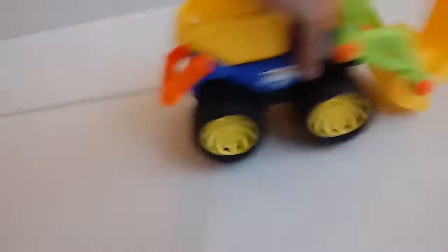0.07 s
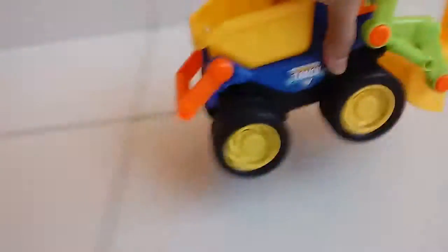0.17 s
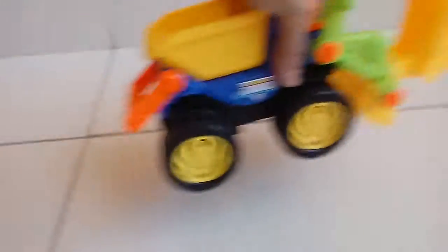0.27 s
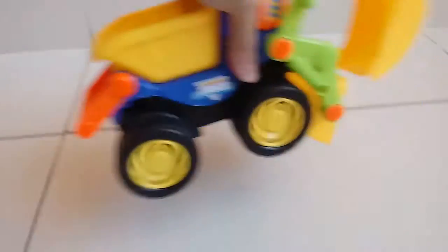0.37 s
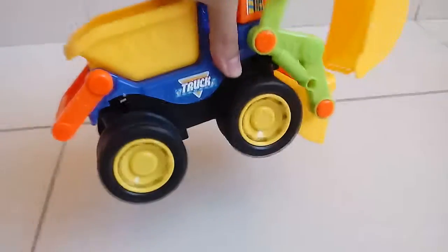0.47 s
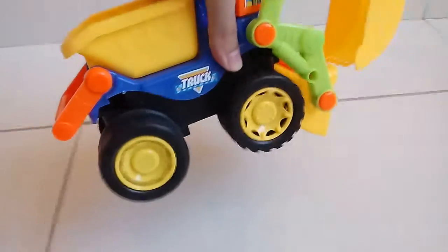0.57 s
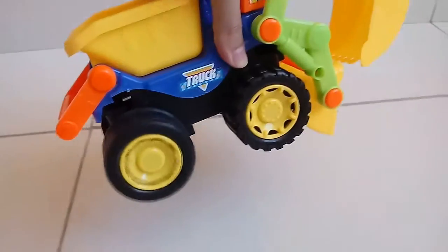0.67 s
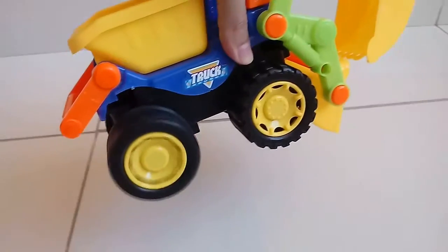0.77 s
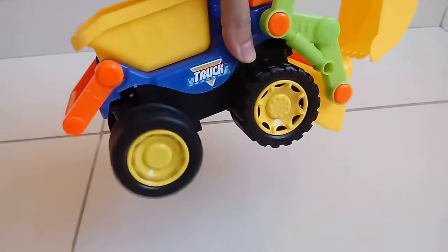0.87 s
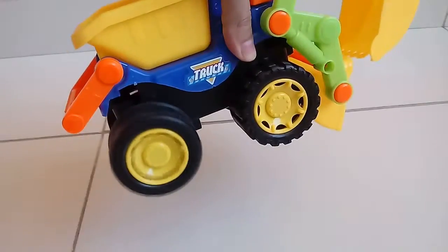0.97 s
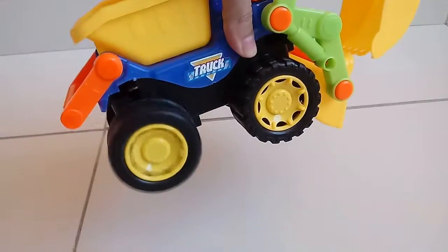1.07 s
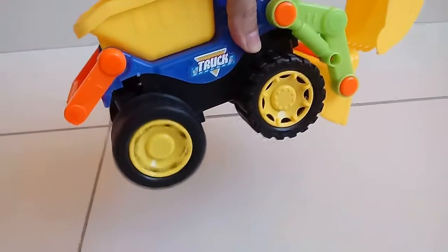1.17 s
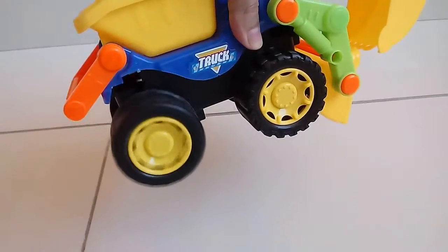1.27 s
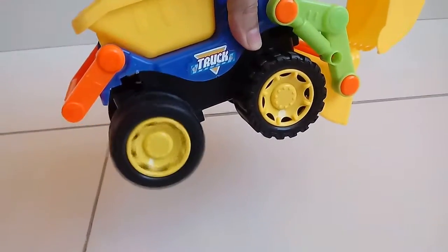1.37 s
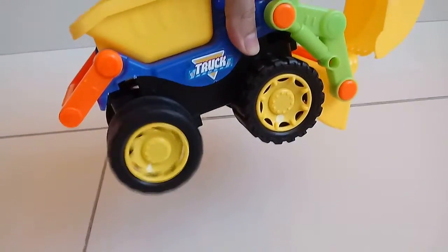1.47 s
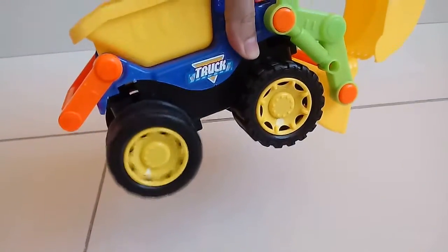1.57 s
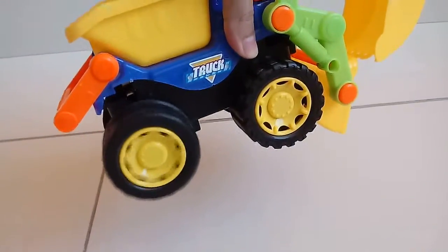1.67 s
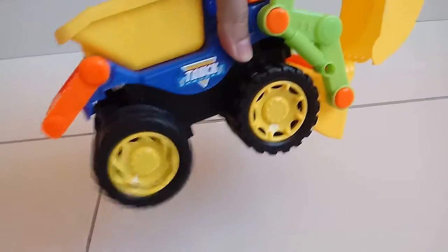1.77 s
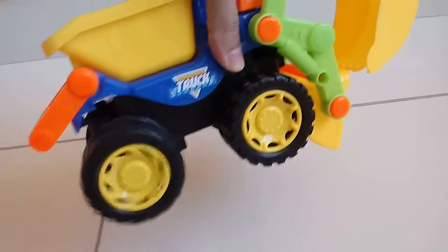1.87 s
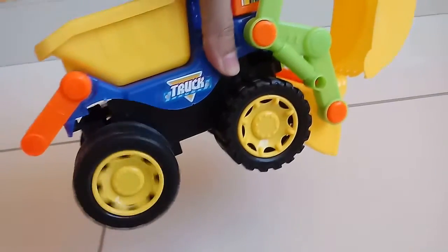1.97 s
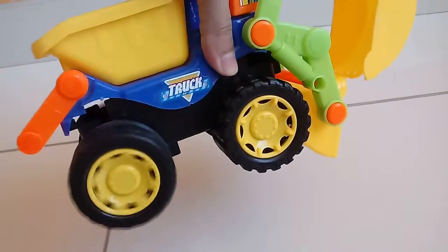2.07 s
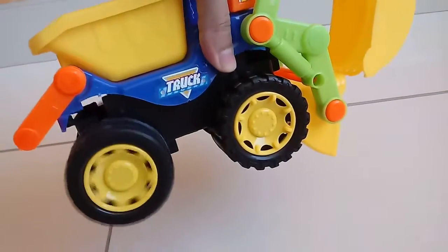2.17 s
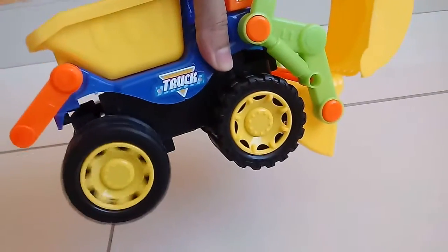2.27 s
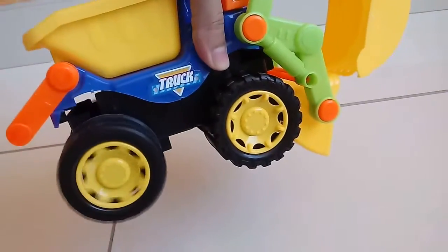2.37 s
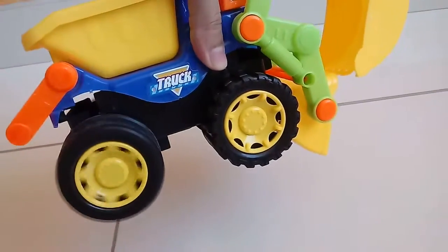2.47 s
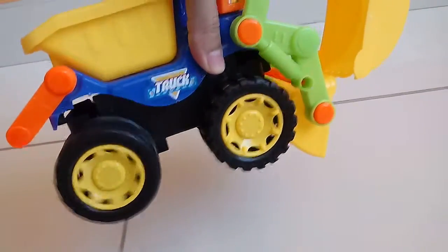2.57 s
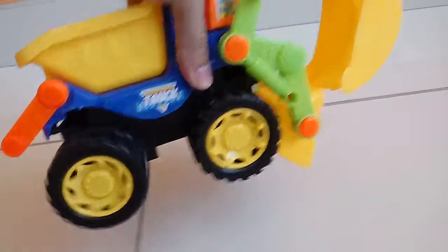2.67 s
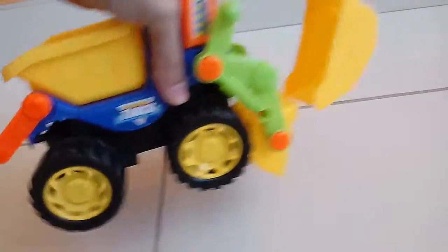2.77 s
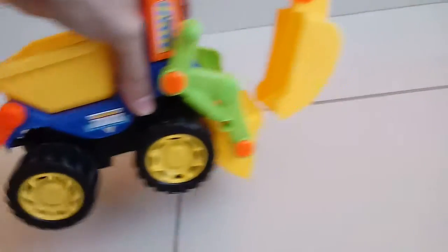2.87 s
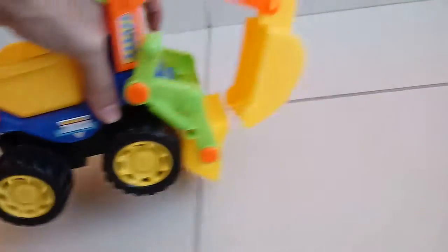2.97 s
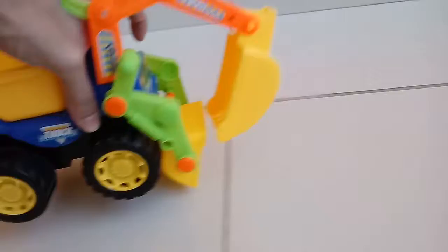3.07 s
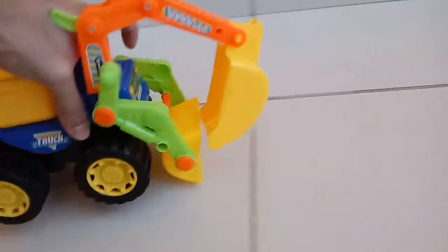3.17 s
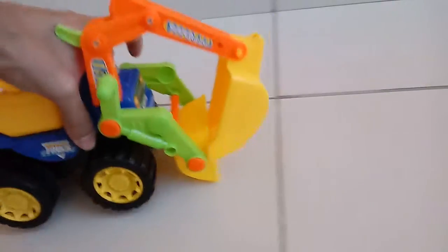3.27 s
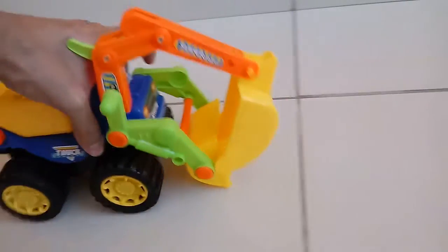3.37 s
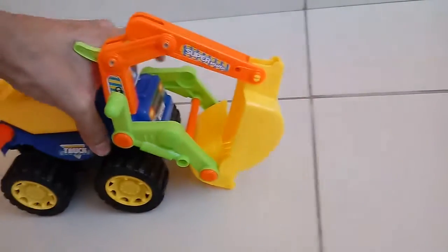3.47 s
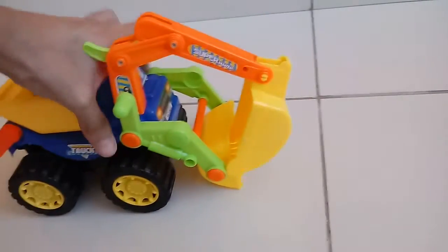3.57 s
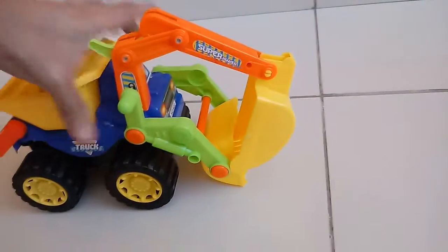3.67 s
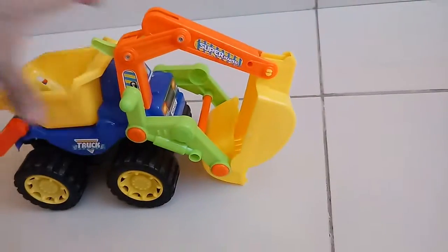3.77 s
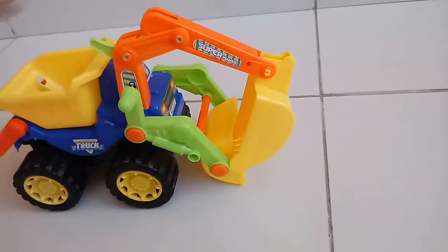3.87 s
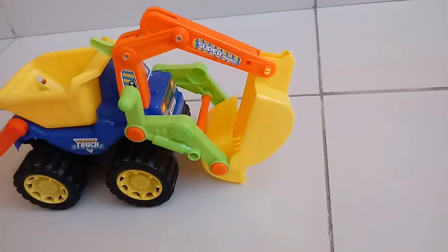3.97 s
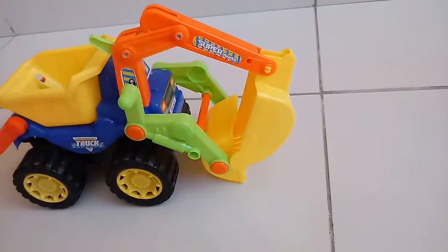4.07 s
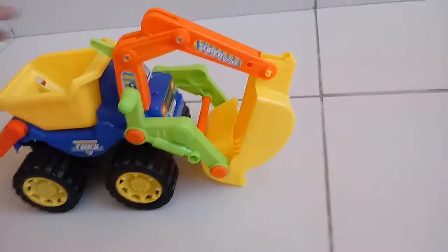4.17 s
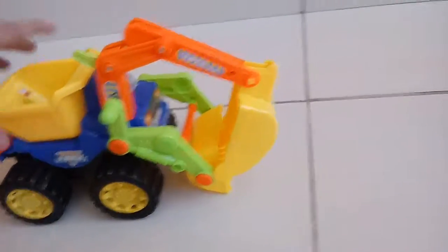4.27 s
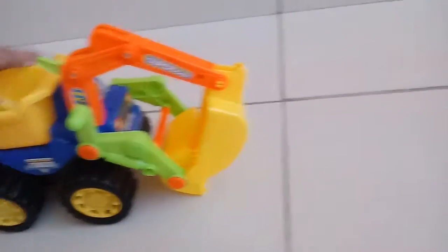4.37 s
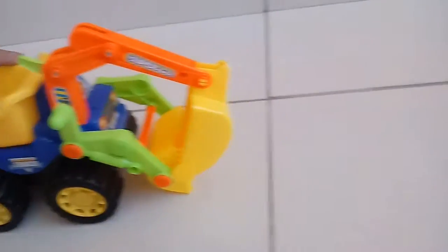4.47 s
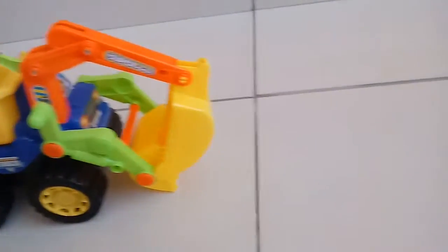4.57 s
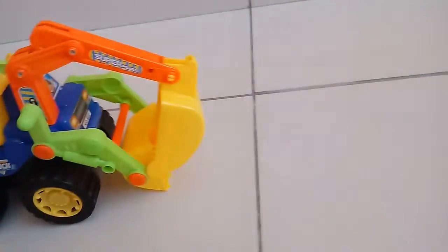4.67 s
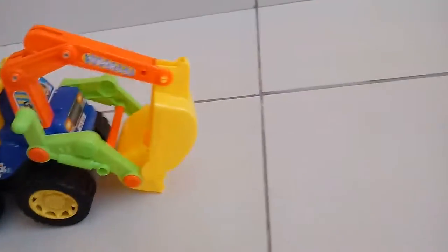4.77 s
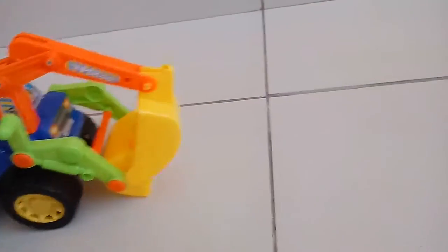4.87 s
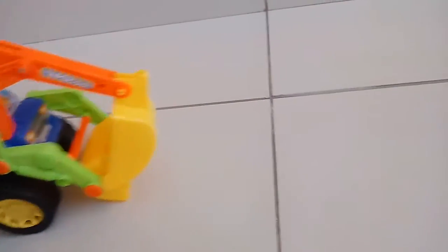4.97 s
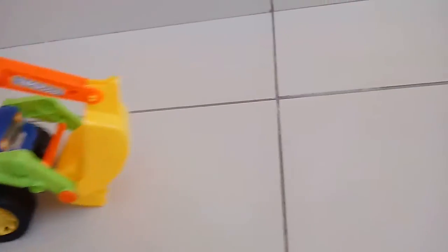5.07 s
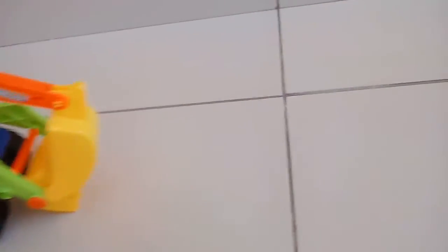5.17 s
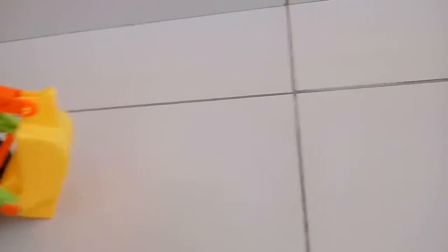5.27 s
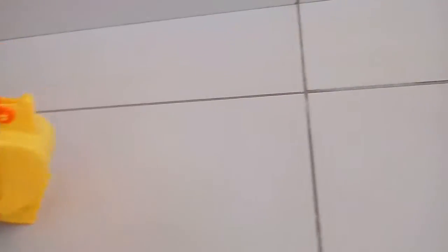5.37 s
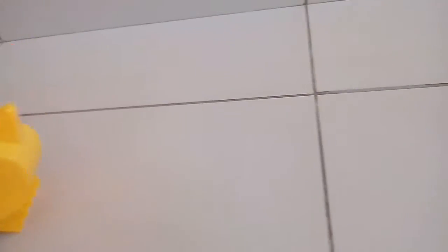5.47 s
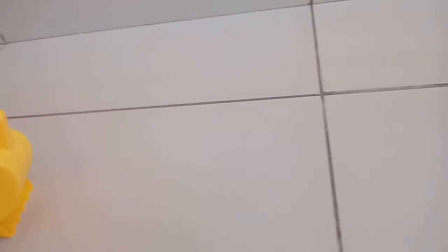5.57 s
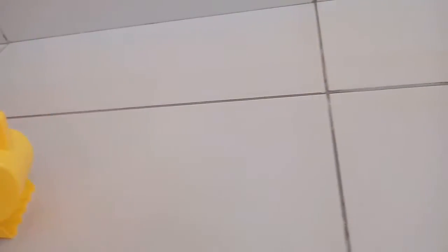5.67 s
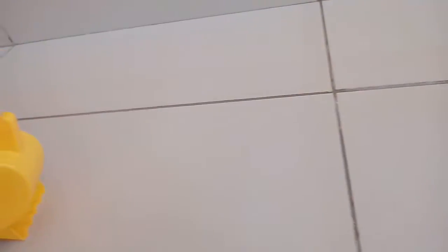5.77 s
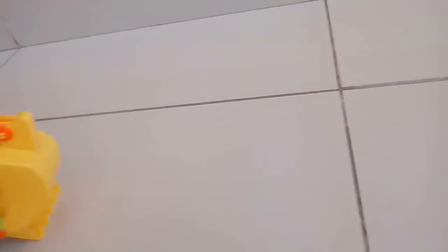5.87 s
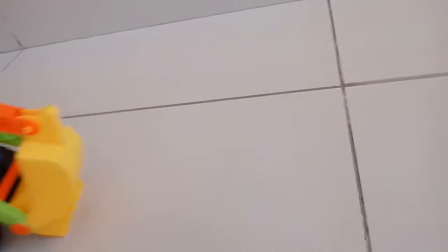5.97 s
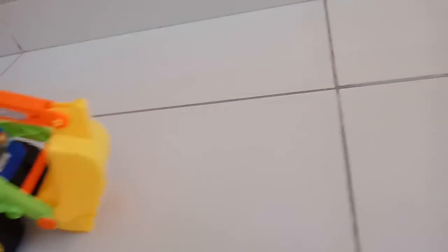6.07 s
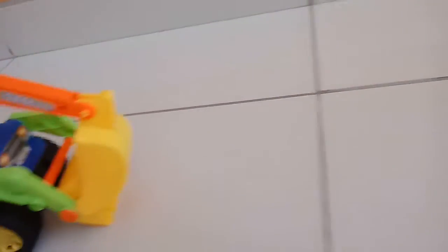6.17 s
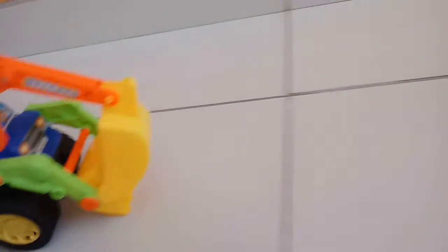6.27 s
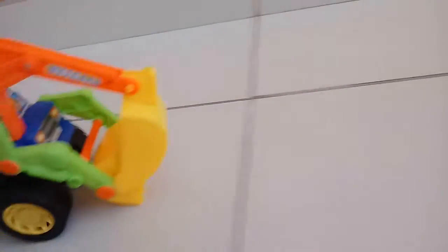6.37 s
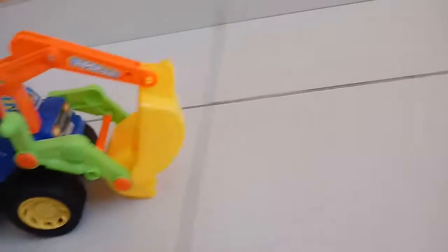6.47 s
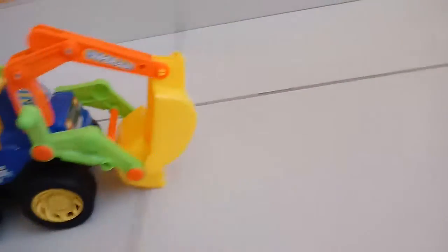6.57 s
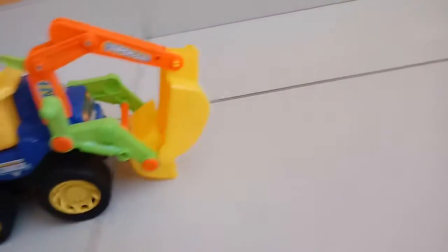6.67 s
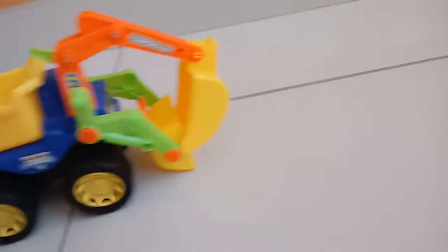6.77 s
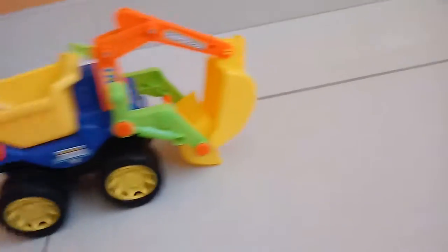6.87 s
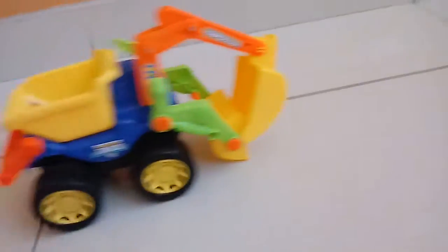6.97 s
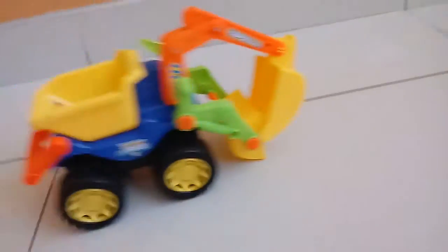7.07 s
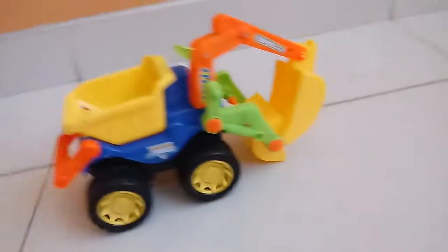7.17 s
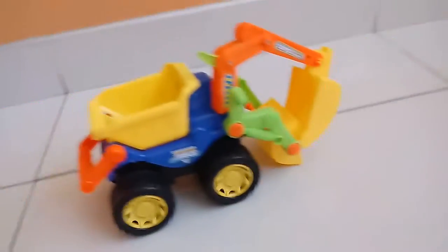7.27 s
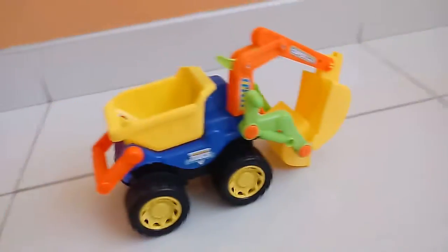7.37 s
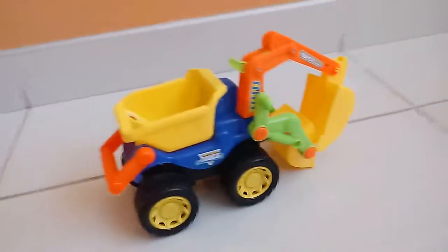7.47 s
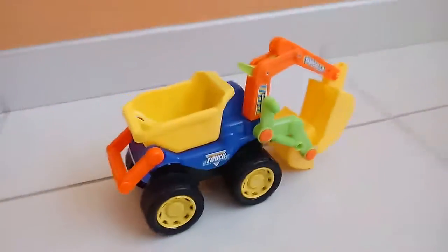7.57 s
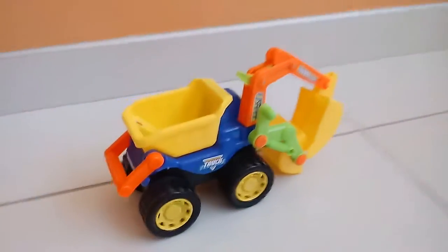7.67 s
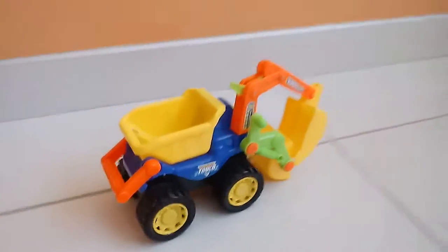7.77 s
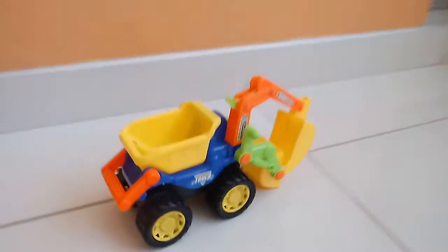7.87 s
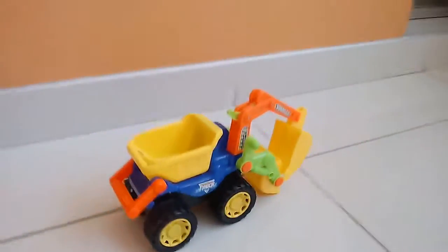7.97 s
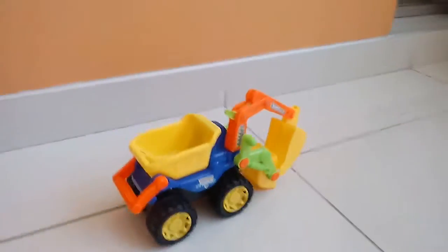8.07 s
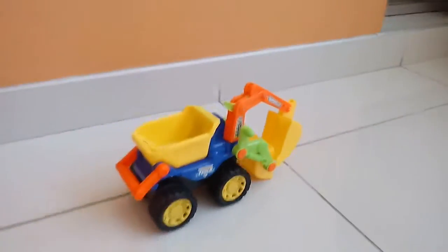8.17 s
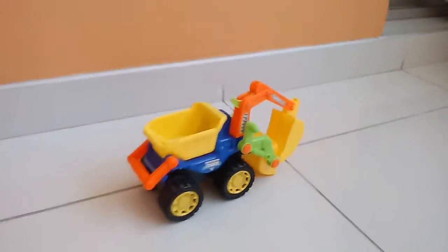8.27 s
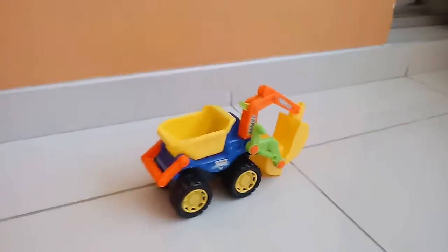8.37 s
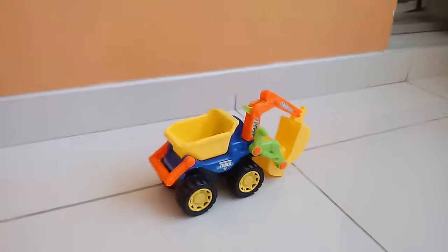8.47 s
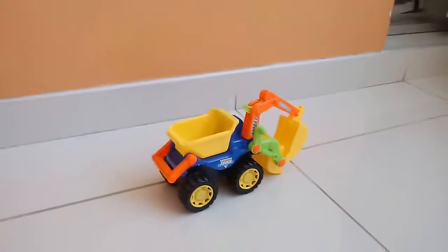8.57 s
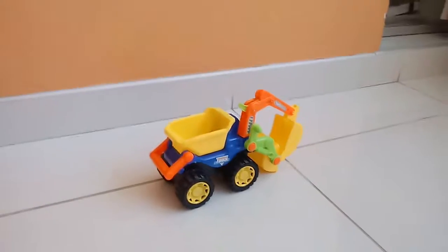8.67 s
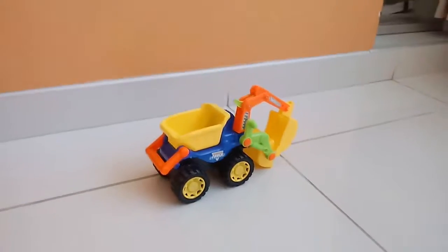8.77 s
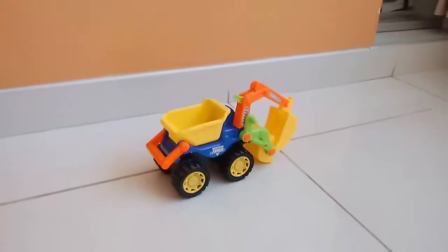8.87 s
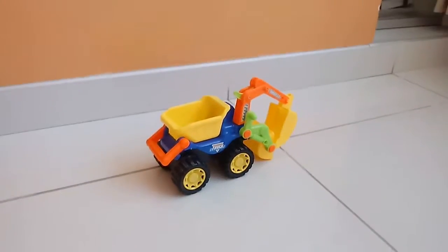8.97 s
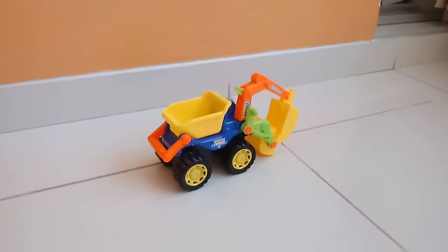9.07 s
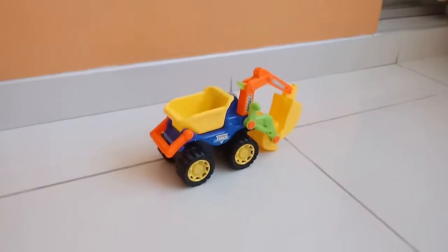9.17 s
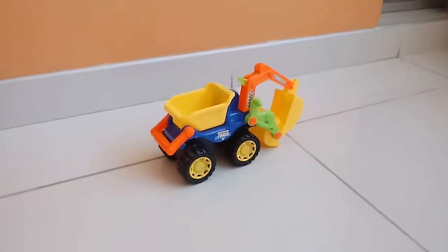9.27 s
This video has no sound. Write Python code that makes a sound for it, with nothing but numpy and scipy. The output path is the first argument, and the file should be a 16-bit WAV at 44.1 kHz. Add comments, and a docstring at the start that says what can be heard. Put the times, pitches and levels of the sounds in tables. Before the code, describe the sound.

Close up in a small echoing tiled room, a toy truck's flywheel gearbox whirs loudly with rattling plastic, then slows in pitch while held in the air. A rubber squeak and knocks interrupt it. It clacks down onto the floor and stops. After quiet handling scuffs come a brief rough nudge, then a strong push with rumbling hollow wheels, slowing to a stop with loose clacks. A faint knock ends it.

```python
"""A toy truck's flywheel gearbox whirs and rattles: each pinion tooth strikes a resonant plastic body.
The truck is pushed, lifted as it spins down, set down, nudged, then pushed again and let go.
Random grains shake the hollow wheels into a rumble on the tiles; loose parts clatter and clack as
struck resonators. Filtered friction scuffs, damped thuds bump, a stick-slip sole squeaks once and
one far knock sounds; sparse echoes answer over shaped-noise hush and a buzz pulsed by the mains."""
import sys
import numpy as np
from scipy import signal
from scipy.fft import rfft, irfft
from scipy.io import wavfile
from scipy.ndimage import uniform_filter1d

SR = 44100
rng = np.random.default_rng(int(sys.argv[2]) if len(sys.argv) > 2 else 0)


def log_audio(samples):
    """Write samples as a 16-bit WAV file to the path given in sys.argv[1]."""
    # one column per channel
    frames = np.atleast_2d(samples).T
    # limit to full scale, then quantise
    limited = np.clip(frames, -1, 1)
    pcm = np.round(limited * 32767).astype(np.int16)
    wavfile.write(sys.argv[1], SR, pcm)


N = 411453
TIME = np.arange(N) / SR
BINS = np.fft.rfftfreq(4096, 1 / SR)

# Flywheel speed once wound up, in each of three runs: t/s, pinion teeth meshing per second
LIFTED_SPIN = [(0.12, 1002), (0.45, 939.2), (0.65, 884.7), (0.88, 766.5), (1.01, 735.7), (1.16, 658.6),
               (1.8, 446.1), (2.63, 338.8), (3.26, 265.8), (3.38, 250.4)]
NUDGED_SPIN = [(5.22, 221), (5.33, 227), (5.55, 212)]
RELEASED_SPIN = [(6.5, 477.8), (6.59, 517.3), (6.682, 512.1), (6.744, 496.1), (6.866, 442.6),
                 (6.926, 438.9), (7.12, 381.6), (7.234, 363.9), (7.312, 329.3), (7.502, 304.9),
                 (7.606, 268.0), (7.7, 256.0)]
# The runs: push begins t/s, standstill t/s, level before the speed law/dB, extra rattle at the start/dB
RUNS = [(-0.25, 3.72, -15.5, 1.5), (4.63, 5.79, -15.5, 7.5), (5.85, 8.5, -16.5, 2)]
# Load on the wheels, high when pressed on the floor, low in the air: t/s, level/dB
LOAD = [(0.1, 0), (0.24, -5.5), (0.33, -15.5), (0.6, -16), (0.72, -12.5), (1.6, -6.5), (2.3, -23),
        (3.18, -20), (3.45, -2.5), (4.8, -5), (5.15, -4.5), (5.45, -8.5), (6.1, -1.5), (6.55, -3),
        (6.7, -8.5), (7.3, -10), (7.75, -6.5), (8.3, 1.5)]
# Gearbox in its plastic body: f/Hz, level/dB
BODY_COLOUR = [(100, -24.5), (500, -21), (900, -20.5), (1300, -17.5), (2500, -9), (3500, -3), (5000, -4),
               (6000, -7.5), (7300, -8), (8500, -13), (10000, -15), (11000, -23)]
# Resonances of that body: f/Hz, width/Hz, boost/dB
BODY_MODES = [(893, 110, 8.3), (1573, 110, 8.7), (2021, 272, 19.9), (2994, 270, 6.6), (3608, 190, 4.4),
              (4283, 320, 7), (5040, 430, 6.7), (10660, 290, 15)]
# Colour of the backlash rattle on top of the body: f/Hz, level/dB
RATTLE_COLOUR = [(300, 11), (1500, 6), (2050, -17.5), (2600, -0.5), (3700, -2.5), (5000, 0.5), (5900, 1),
                 (6700, -5), (8500, -7.5), (10000, -6)]
# Two added gearbox rings: t/s, top ring level/dB, middle ring level/dB
RING_LEVELS = [(0, -5, 1), (0.3, -1.5, 5), (1.55, 11, 6), (1.9, 12.5, 4), (2.6, 11, 3), (2.85, 13.5, -6),
               (3.6, 12.5, -11), (4.9, 11.5, 8), (5.9, 8, -23), (6.7, 14.5, 2), (7.3, 8, 8), (7.7, 4, 7.5),
               (8.2, 11, -2)]
# Hollow wheels: f/Hz, level/dB
WHEEL_COLOUR = [(60, -32), (200, -14), (450, -23.5), (650, -5), (830, 1), (950, 1.5), (1130, 3), (1400, -7),
                (1700, -2), (2400, -8), (5000, -29.5)]
# Joints between tiles, where the rumble rises: t/s, boost/dB
JOINTS = [(5.07, 7.5), (6.82, 12), (7.46, 0.5)]
# Hush of the room: f/Hz, relative density level/dB per Hz
HUSH_COLOUR = [(25, -23), (50, -4.5), (80, 0.5), (170, -7), (300, -14), (600, -24), (1200, -26),
               (2200, -30.5), (6500, -32), (8000, -47), (11000, -42)]
# Scuffs of plastic, skin and cloth: start t/s, length/s, rms level/dB, centre f/Hz, width/Hz
SCUFFS = [(0.24, 0.32, -34, 95, 170), (2.328, 0.039, -35, 510, 600), (3.236, 0.096, -34.5, 1480, 394),
          (3.66, 0.25, -57.5, 1450, 1200), (4.134, 0.067, -51, 2800, 1610), (4.156, 0.051, -48.5, 760, 600),
          (4.353, 0.27, -52, 2940, 4940), (4.52, 0.175, -32, 180, 96), (4.727, 0.24, -39, 830, 250),
          (4.954, 0.5, -39.5, 129, 70), (8.582, 0.37, -53, 3400, 4140), (9.192, 0.078, -48.5, 400, 800)]
# Dull bumps of hands and feet: t/s, peak level/dB, middle f/Hz, t60/s
BUMPS = [(0.281, -23, 35, 0.18), (0.398, -11.5, 317, 0.052), (0.446, -12.5, 315, 0.12),
         (1.722, -11, 306, 0.062), (2.064, -13, 286, 0.067), (2.319, -7.5, 120, 0.011),
         (2.323, -15, 25, 0.15), (2.385, -10, 250, 0.031), (2.602, -24.5, 40, 0.15),
         (3.703, -23.5, 327, 0.018), (3.776, -29, 190, 0.14), (4.067, -14.5, 129, 0.023),
         (4.323, -21, 85, 0.071), (4.681, -18, 90, 0.023), (5.469, -19, 186, 0.016),
         (5.662, -26, 210, 0.03)]
# Clacks of loose plastic parts: t/s, peak level/dB, main ring f/Hz, ring over snap/dB
CLACKS = [(1.703, -8, 2400, 32), (2.308, -5, 1500, 3), (2.311, -8.5, 1000, 22), (2.316, -5, 2200, 7),
          (3.207, -10.5, 2500, 7), (3.2169, -8.5, 1540, 23), (3.395, -9, 2970, 15), (3.42, -13, 2600, 13),
          (3.634, -14, 2420, 4), (3.667, -14.5, 1370, 19), (3.727, -23.5, 1610, 18),
          (4.067, -30.5, 2100, 13), (4.329, -25.5, 2010, 9.5), (4.387, -23.5, 1700, 9),
          (4.722, -23.5, 816, 15), (5.009, -19, 1700, 14), (5.243, -20, 1210, 27), (7.767, -14, 1400, 20),
          (7.843, -8, 2000, 10), (7.934, -11, 1520, 14), (8.64, -34, 2830, 11)]
# Snap of a struck plastic part: f/Hz, level/dB
SNAP_COLOUR = [(100, -27), (600, 5), (1200, 0), (4500, 2.5), (6500, -6), (8500, -15), (11000, -14.5)]
# Knock elsewhere in the room: t/s, peak level/dB, f/Hz, width setting/Hz
KNOCKS = [(9.201, -24.5, 680, 332)]
# Reverberation: f/Hz, t60/s
ROOM_DECAY = [(200, 0.45), (1500, 0.73), (5000, 0.68), (11000, 0.33)]

TEETH = 8  # on the flywheel pinion
# loudness grows as a power of speed and levels off above the knee (teeth per second)
SPEED_POWER, KNEE_HZ = 1.413, 600
# load makes the teeth bounce: rattle against clean meshing at 0 dB load (dB), and its rise per dB of load
RATTLE_DB, RATTLE_PER_LOAD = 5, 0.59
# timing scatter of the teeth: at least (ms), and the share of a tooth period that rattle adds
SCATTER_MS, BACKLASH = 0.0085, 0.0021
SPREAD_MS = 5.0  # travel time of a 1 kHz bending wave through the shell
TOP_RING, MIDDLE_RING = (6700, 330), (4043, 300)  # f/Hz, width/Hz
# as the truck lands, the gears jump out of mesh for a moment
LANDING_S, JUMP_S, JUMP_DB = 3.228, 0.019, -24
JOINT_S = 0.061  # time for a joint's boost to fall to 1/e of its dB
CLATTER_PER_S, CLATTER_DB, CLATTER_SPREAD_DB = 45, 21, 4  # knock rate, gain, spread of knock sizes
CLATTER_RING = (1350, 600, 14)  # f/Hz, width/Hz, boost/dB
HUSH_DB, MAINS_HZ = -46, 60.3
# each bump has a softer, slower rebound: delay (s), level (dB), pitch ratio
REBOUND_S, REBOUND_DB, REBOUND_RATIO = 0.011, -8.5, 0.48
SHARP_DB = 16  # each such step of ring over snap raises the ring's Q by one
SQUEAK_S, SQUEAK_DB, SQUEAK_TOP_HZ = 1.815, -14.5, 2226
CLIMB_S, CLIMB_HZ_PER_S, SAG_HZ_PER_S = 0.054, 4900, 9200
ATTACK_S, HOLD_S, FADE_DB_PER_S = 0.012, 0.12, 379
EDGE_HZ = 10950  # upper band limit


def amp(db):
    """Level law: decibels to amplitude gain."""
    return 10 ** (np.asarray(db) / 20)


def evened(x):
    """Power normalisation: scales to rms 1."""
    return x / np.sqrt(np.mean(x ** 2) + 1e-20)


def curves(rows, t=TIME):
    """Linear interpolation in time of each column after the first."""
    s, *columns = np.transpose(rows)
    return [np.interp(t, s, c) for c in columns]


def read(points, hz=BINS):
    """Interpolation of a spectrum on a log-frequency axis."""
    f, value = np.transpose(points)
    return np.interp(np.log(hz + 1), np.log(f + 1), value)


def peak(hz, width):
    """Resonance: a Lorentzian bell, 1 at its top and half at the edges of its width."""
    return 1 / (1 + (2 * (BINS - hz) / width) ** 2)


def swell(s, length):
    """Gaussian hump in time, 1 at s."""
    return np.exp(-((TIME - s) / length) ** 2)


def response(db):
    """Minimum phase: the causal impulse response that has this colour."""
    log_gain = np.log(amp(np.r_[db, db[-2:0:-1]]))
    spectrum = np.exp(np.conj(signal.hilbert(log_gain)))
    return irfft(spectrum[:len(db)])


def colour(x, db):
    """Linear filtering: convolves x with the response of a colour."""
    return signal.oaconvolve(x, response(db))[:N]


def drift(rate_hz):
    """Low-passed Gaussian noise: slow chance of rms 1."""
    low_pass = np.exp(-(np.fft.rfftfreq(N, 1 / SR) / rate_hz) ** 2)
    return evened(irfft(rfft(rng.standard_normal(N)) * low_pass, N))


def steady(x, size=3500):
    """Running power normalisation: evens a click train near unit power over a wide range of densities."""
    power = uniform_filter1d(uniform_filter1d(x ** 2, size), size)
    return x / np.sqrt(abs(power) + 0.11 * np.mean(x ** 2))


def signs_at(rate):
    """Bernoulli impulses of random sign, at a mean rate per second."""
    return (rng.random(N) < rate / SR) * rng.choice([-1, 1], N)


def add(mix, s, sound):
    """Superposition: mixes a sound in at time s."""
    part = mix[round(s * SR):][:len(sound)]
    part += sound[:len(part)]


def clicks(at, size):
    """Band-limited impulses: windowed sincs centred between samples."""
    near = np.floor(at)[:, None].astype(int) + np.arange(-7, 9)
    gap = near - at[:, None]
    shape = np.sinc(gap) * np.sinc(gap / 8)
    return np.bincount(np.clip(near, 0, N - 1).ravel(), (size[:, None] * shape).ravel(), N)


def motion():
    """Flywheel inertia: a push winds it up, it runs on, then friction brakes it evenly; gives rate and gain."""
    mesh_hz, gain = np.zeros(N), np.zeros(N)
    for (start, stop, db, _), spin in zip(RUNS, (LIFTED_SPIN, NUDGED_SPIN, RELEASED_SPIN)):
        wind_up = 1 - np.interp(TIME, [start, spin[0][0]], [1, 0]) ** 2
        brake = np.interp(TIME, [spin[-1][0], stop], [1, 0])
        hz = curves(spin)[0] * wind_up * brake
        mesh_hz += hz
        gain += amp(db) * (hz / np.hypot(hz, KNEE_HZ)) ** SPEED_POWER
    return mesh_hz, gain


def play(mesh_hz):
    """Backlash: rattle (dB) and timing scatter (ms) grow with load; a rough start settles over the run."""
    rattle_db = RATTLE_DB + RATTLE_PER_LOAD * curves(LOAD)[0]
    for start, stop, _, extra_db in RUNS:
        rattle_db = rattle_db + np.interp(TIME, [start, stop], [extra_db, 0], left=0)
    return rattle_db, SCATTER_MS + 10 ** 3 * BACKLASH * amp(rattle_db) ** 2 / (mesh_hz + 20)


def disperse(x):
    """Dispersion: bending waves travel faster the higher they are, smearing each tick into a chirp."""
    hz = np.fft.rfftfreq(N, 1 / SR)
    return irfft(rfft(x) * np.exp(-4j * np.pi * SPREAD_MS * np.sqrt(hz / 10 ** 3)), N)


def gears(wobble_db=1.5, tooth_db=-0.5, chance_db=0.15, runout_ms=0.01, rattle_wobble_db=4.5,
          bounce_db=3.0, bounces_per_tooth=4, tick_db=-10.0, tick_hz=5100, tick_width=500,
          flutter_db=1.25, level_db=-3.0):
    """Gear meshing: tooth impacts excite the body; backlash adds bounces, hardest once a flywheel turn."""
    mesh_hz, gain = motion()
    rattle_db, scatter_ms = play(mesh_hz)
    teeth = np.cumsum(mesh_hz) / SR
    chance = rng.standard_normal((6000, 2))
    tooth = np.arange(1, int(teeth[-1]))
    at = np.interp(tooth, teeth, np.arange(N))

    # the pinion is a little off centre and oval, which sways the timing and force of its teeth
    angle = 2 * np.pi * tooth / TEETH
    delay_ms = runout_ms * np.sin(angle) + chance[tooth, 0] * scatter_ms[at.astype(int)]
    at = at + delay_ms * SR / 1000
    size = amp(wobble_db * np.cos(angle) + tooth_db * np.cos(2 * angle) + chance_db * chance[tooth, 1])
    body_db = read(BODY_COLOUR) + sum(db * peak(hz, width) for hz, width, db in BODY_MODES)
    mesh = steady(disperse(colour(clicks(at, size), body_db)))

    # the unbalanced flywheel shakes harder with speed
    shake_db = rattle_wobble_db * mesh_hz / mesh_hz.max()
    turn_db = shake_db * np.cos(2 * np.pi * teeth / TEETH)
    bounces = signs_at(bounces_per_tooth * mesh_hz + 1800)
    bounces = bounces * amp(bounce_db * np.clip(rng.standard_normal(N), -2, 2) + turn_db)
    rattle = steady(colour(bounces, body_db + read(RATTLE_COLOUR)))

    # once a turn the axle taps its bearing
    taps = clicks(at, size * (tooth % TEETH == 0))
    ticks = steady(colour(taps, 20 * np.log10(peak(tick_hz, tick_width) + 0.00033)))

    whir = mesh + amp(tick_db) * ticks + amp(rattle_db) * rattle
    whir = whir / np.sqrt(1 + amp(rattle_db) ** 2)
    top_db, middle_db = curves(RING_LEVELS)
    top = amp(top_db) * colour(whir, 10 * np.log10(peak(*TOP_RING)))
    middle = amp(middle_db) * colour(whir, 10 * np.log10(peak(*MIDDLE_RING)))
    sway_db = flutter_db * drift(19) + JUMP_DB * swell(LANDING_S, JUMP_S)
    return (whir + top + middle) * gain * amp(level_db + sway_db)


def rolling():
    """Rolling excitation: speed, load and tile joints set how hard the wheels are shaken."""
    joints_db = sum(db * swell(s, JOINT_S) for s, db in JOINTS)
    return motion()[1] * amp(curves(LOAD)[0] + joints_db)


def wheels(grains_per_s=900, grain_db=3, lumpy_db=2.5, level_db=-2):
    """Random impact excitation: tread and grit knock the resonant hollow wheels."""
    sizes_db = grain_db * np.minimum(rng.exponential(1, N), 4)
    grains = signs_at(grains_per_s) * amp(sizes_db)
    rumble = steady(colour(grains, read(WHEEL_COLOUR)))
    return rumble * rolling() * amp(level_db + lumpy_db * drift(19))


def clatter():
    """Random impacts on a resonator: the shaking wheels jolt the loose arm and bucket."""
    hz, width, db = CLATTER_RING
    sizes_db = CLATTER_SPREAD_DB * np.clip(rng.standard_normal(N), -2, 1.5)
    jolts = (rng.random(N) < CLATTER_PER_S / SR) * amp(sizes_db)
    ring = response(read(SNAP_COLOUR) + db * peak(hz, width))
    return amp(CLATTER_DB) * signal.oaconvolve(jolts * rolling(), ring / np.linalg.norm(ring))[:N]


def background(buzz_db=-61, buzz_hz=6300, buzz_width=1100):
    """Noise shaping and modulation: a coloured hush, and a thin buzz sparking twice per mains cycle."""
    hush = amp(HUSH_DB) * evened(colour(rng.standard_normal(N), read(HUSH_COLOUR)))
    cycle = (TIME * MAINS_HZ) % 1
    sparks = np.exp(-cycle / 0.027) + 0.42 * np.exp(-((cycle - .28) % 1) / .04)
    buzz = colour(sparks * rng.standard_normal(N), 20 * np.log10(peak(buzz_hz, buzz_width) + 1e-3))
    return hush + amp(buzz_db) * evened(buzz)


def scuffs(grain_db=1.0, fade=0.34):
    """Friction noise: short grainy rubs, each filtered by one broad resonance."""
    out, friction = np.zeros(N), rng.standard_normal(N) * amp(grain_db * drift(300))
    for s, length, db, hz, width in SCUFFS:
        stroke = friction[round(s * SR):][:round(length * SR)]
        stroke = stroke * signal.windows.tukey(len(stroke), fade)
        # 1.5 makes the half-power width of the bell nearly the listed width
        resonance = response(20 * np.log10(peak(hz, 1.5 * width) + 0.0022))
        add(out, s, amp(db) * evened(signal.fftconvolve(stroke, resonance)))
    return out


def thud(db, hz, t60, sag=0.2, rise_s=0.0018, shudder=0.4):
    """Damped oscillation: a soft thud whose pitch sags as the contact relaxes."""
    t = TIME[:SR // 4]
    turns = np.cumsum(hz * (1 + sag * (2 * np.exp(-t / 0.0091) - 1))) / SR
    low_pass = signal.butter(2, 2.02 * hz, fs=SR, output="sos")
    grit = evened(signal.sosfilt(low_pass, rng.standard_normal(len(t))))
    envelope = amp(-60 * t / t60) * (1 - np.exp(-t / rise_s))
    sound = (shudder * grit - np.sin(2 * np.pi * turns)) * envelope
    return amp(db) * sound / abs(sound).max()


def bumps():
    """Impact and rebound: the rebound is lower in pitch and decays over as many cycles."""
    out = np.zeros(N)
    for s, db, hz, t60 in BUMPS:
        add(out, s, thud(db, hz, t60))
        add(out, s + REBOUND_S, thud(db + REBOUND_DB, hz * REBOUND_RATIO, t60 / REBOUND_RATIO))
    return out


def clacks(chatter=0.29, chatter_s=0.0025):
    """Impulse response: a snap and brief decaying chatter excite the short ring of a struck part."""
    out, t = np.zeros(N), TIME[:900]
    for s, db, hz, ring_db in CLACKS:
        width = hz / (1 + abs(ring_db) / SHARP_DB)
        blow = (t == 0) + chatter * rng.standard_normal(len(t)) * np.exp(-t / chatter_s)
        sound = signal.fftconvolve(blow, response(read(SNAP_COLOUR) + ring_db * peak(hz, width)))
        add(out, s, amp(db) * sound / abs(sound).max())
    return out


def squeak(waver=0.034, flutter_db=2, overtone_db=-24, judder=0.24, judder_hz=680):
    """Stick-slip of rubber: a wavering whistle climbs and sags; fast judder adds sidebands."""
    t = np.clip(TIME - SQUEAK_S, 0, .5)
    hz = SQUEAK_TOP_HZ - np.maximum(CLIMB_HZ_PER_S * (CLIMB_S - t), SAG_HZ_PER_S * (t - CLIMB_S))
    phase = 2 * np.pi * np.cumsum(hz * (1 + waver * drift(250))) / SR
    db = SQUEAK_DB - FADE_DB_PER_S * np.maximum(t - HOLD_S, 0) + flutter_db * drift(120)
    whistle = np.sin(phase) + amp(overtone_db) * np.sin(2 * phase)
    whistle = whistle * (1 + judder * np.sin(2 * np.pi * judder_hz * t))
    return np.sqrt(2) * whistle * amp(db) * np.minimum(t / ATTACK_S, 1)


def knock():
    """Impulse response of a single broad resonance: one hollow knock."""
    out = np.zeros(N)
    for s, db, hz, width in KNOCKS:
        sound = response(20 * np.log10(peak(hz, 2 * width) ** 1.2 + 1e-4))
        add(out, s, amp(db) * sound / abs(sound).max())
    return out


def room(x):
    """Reverberation: sparse echoes off tiles and walls, decaying at a rate set by frequency."""
    count = SR // 2
    taps = rng.choice([-1., 1.], count) * (rng.random(count) < .06) * (TIME[:count] > .004)
    hz, t, bands = signal.stft(taps, SR, nperseg=256)
    decay = amp(-60 * t / read(ROOM_DECAY, hz)[:, None])
    tail = signal.istft(bands * decay, SR, nperseg=256)[1]
    return signal.fftconvolve(x, tail / np.linalg.norm(tail))[:N]


def scene():
    """Superposition of direct sound, echoes and background."""
    truck = gears() + wheels() + clatter() + scuffs() + clacks()
    thuds, sole, far = bumps(), squeak(), knock()
    echo = room(amp(-8.5) * truck + amp(-10.5) * sole + amp(-12) * thuds + amp(-7) * far)
    return (truck + sole + thuds + far + echo + background())[None]


def record(dry):
    """Soft saturation rounds off the loudest peaks; a low-pass filter then limits the band."""
    rounded = dry / (1 + (dry / .85) ** 6) ** (1 / 6)
    low_pass = signal.firwin(601, EDGE_HZ, window=("kaiser", 8), fs=SR)
    return signal.oaconvolve(rounded, low_pass[None], "same")


dry = scene()
out = record(dry)
log_audio(out)
```